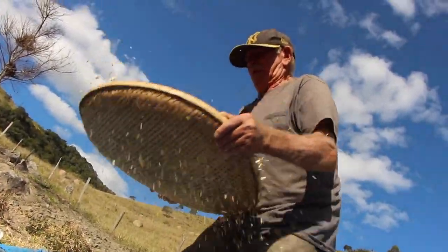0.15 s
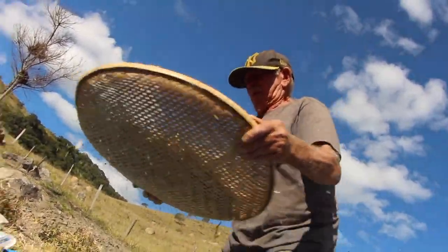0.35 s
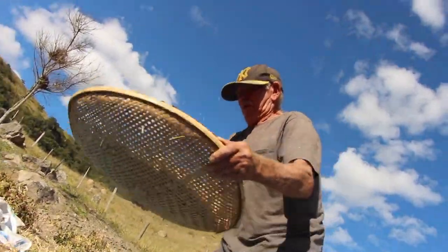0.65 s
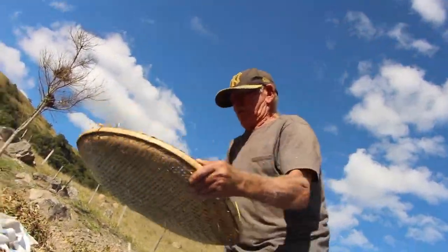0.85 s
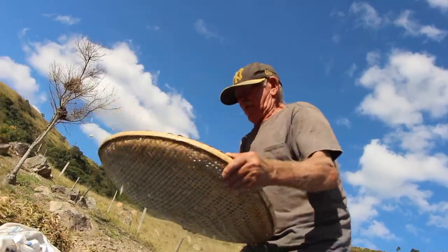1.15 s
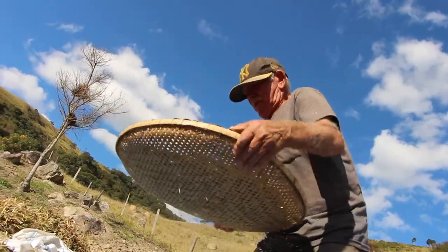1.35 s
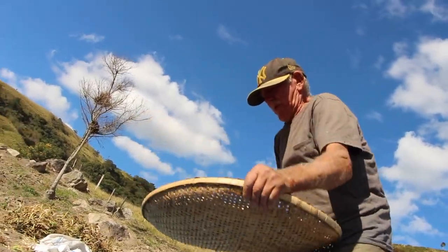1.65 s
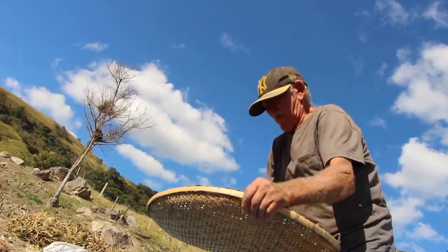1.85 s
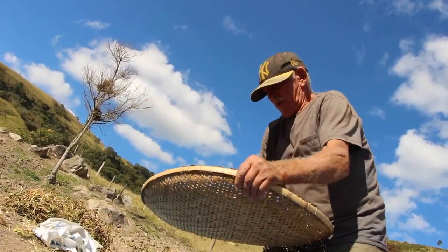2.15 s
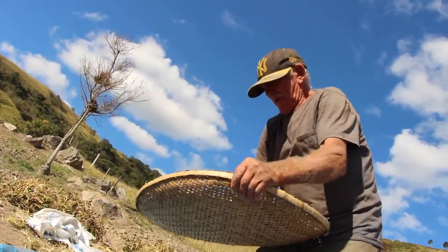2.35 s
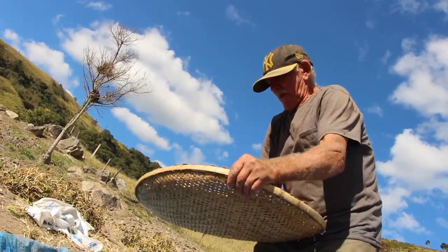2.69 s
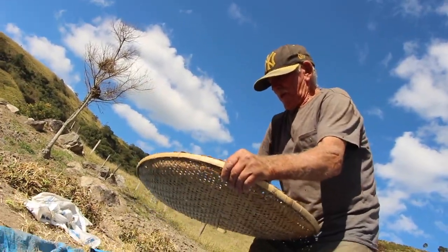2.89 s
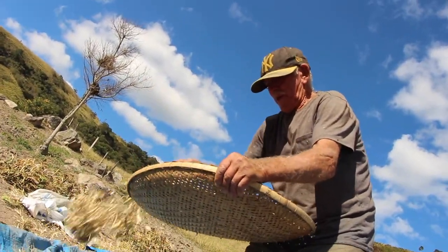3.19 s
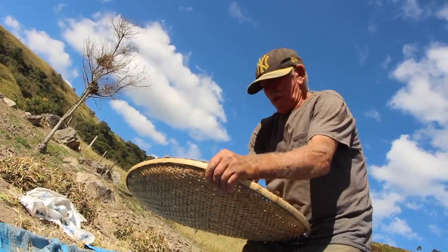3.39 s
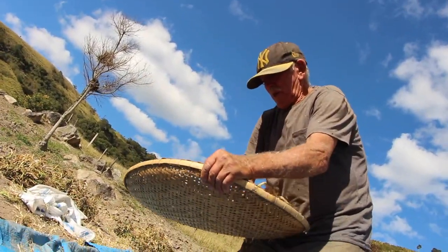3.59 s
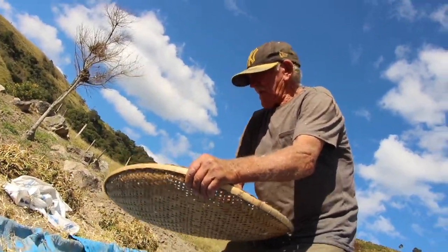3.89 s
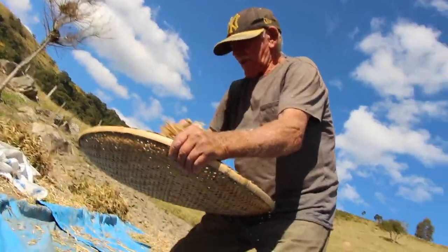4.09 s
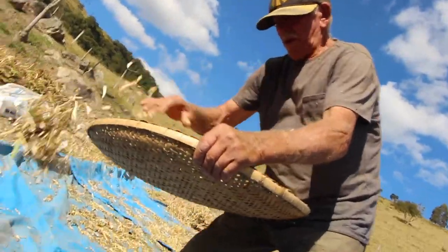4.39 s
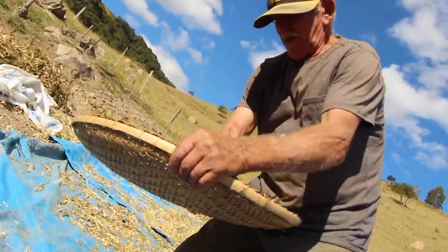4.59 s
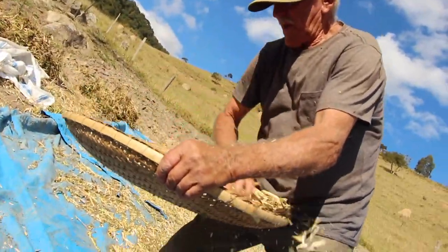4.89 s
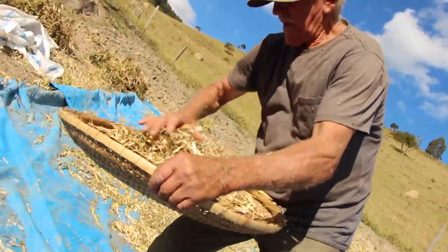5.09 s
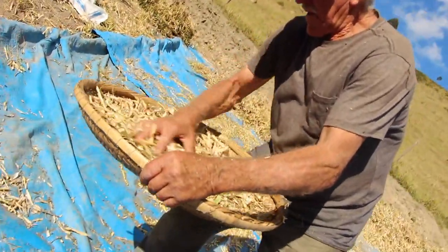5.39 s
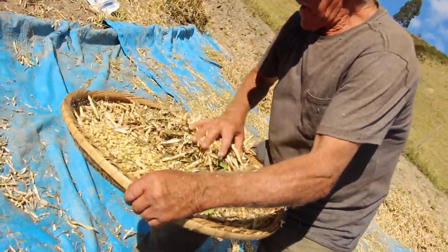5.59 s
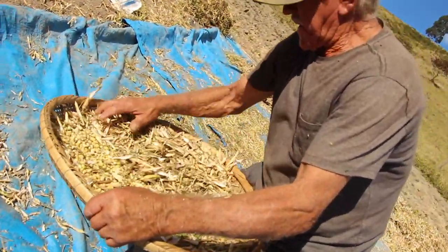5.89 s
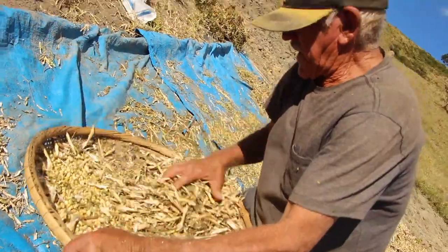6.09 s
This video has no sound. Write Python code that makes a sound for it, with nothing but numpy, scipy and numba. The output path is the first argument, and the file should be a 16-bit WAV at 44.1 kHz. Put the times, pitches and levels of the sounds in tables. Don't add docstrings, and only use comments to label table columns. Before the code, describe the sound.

Close up on an open hillside, dry pods, beans and chaff are tossed in a woven sieve in quick, regular, bright swishes. The shaking stops and a hand rakes the heap in softer uneven strokes, with brittle snaps, ticks and scrapes on the weave. Two handfuls fall back with short crunchy bursts, then broader raking follows. Low wind buffets the stereo microphone over faint air and hiss.

```python
import sys
import numpy as np
from scipy import signal
from scipy.fft import rfft, irfft
from scipy.io import wavfile
from scipy.ndimage import uniform_filter1d
from numba import njit

SR = 44100
rng = np.random.default_rng(int(sys.argv[2]) if len(sys.argv) > 2 else 0)


def inscribe(sig):
    pcm = np.round(np.clip(np.atleast_2d(sig).T, -1, 1) * 32767)
    wavfile.write(sys.argv[1], SR, pcm.astype(np.int16))


def field_ratio(decibels):
    return 10 ** (np.asarray(decibels, dtype=float) / 20)


N = 275625
T = np.arange(N) / SR
SLOW = T[::32]


def unit(x):
    return x / np.sqrt(np.mean(x ** 2))


def band(x, lo_hz, hi_hz):
    edges_hz = [lo_hz, min(hi_hz, .45 * SR)]
    return signal.sosfilt(signal.butter(4, edges_hz, "band", fs=SR, output="sos"), x)


def colour(x, points):
    hz, db = np.transpose(points)
    f = np.maximum(np.arange(N // 2 + 1) * SR / N, 1)
    gain_db = np.interp(np.log(f), np.log(hz), db)
    return unit(irfft(rfft(x) * field_ratio(gain_db), N))


def walk(rate_hz):
    hold = max(int(SR / rate_hz), 1)
    steps = np.repeat(rng.standard_normal(N // 20), hold)[:N]
    return unit(uniform_filter1d(steps, hold))


def swells(s, db, rise_s, fall_s, steep):
    late_s = SLOW[:, None] - s
    side_s = np.where(late_s < 0, rise_s, fall_s)
    return np.sum(field_ratio(2 * db - 20 * steep * (late_s / side_s) ** 2), axis=1)


def as_db(power):
    return np.interp(T, SLOW, 10 * np.log10(power))


@njit
def rings(start, hz, t60, size, length):
    out = np.zeros(length)
    for k in range(len(start)):
        pole = (2j * np.pi * hz[k] - np.log(1000) / t60[k]) / SR
        first = int(np.ceil(start[k]))
        z = size[k] * np.exp(pole * (first - start[k]))
        p = np.exp(pole)
        for i in range(max(first, 0), min(first + int(t60[k] * SR) + 2, length)):
            out[i] += z.imag
            z *= p
    return out


def both_ports(s, hz, t60, size, place, pan_db):
    port_lag, lag_scatter = 1.88, .38
    shift_lag, shift_s, shift_lasts_s = .2, 3.9, .6
    shifted = np.clip((s - shift_s) / shift_lasts_s, 0, 1)
    lag = (port_lag + shift_lag * shifted) * (1 + .2 * (hz / 13000) ** 2) + lag_scatter * place
    left = rings(s * SR, hz, t60, size * field_ratio(pan_db / 2), N)
    right = rings(s * SR + lag, hz, t60, size * field_ratio(-pan_db / 2), N)
    return np.array([left, right])


def rustle():
    # [lowest f/Hz, highest f/Hz, cycles rung, collisions/s, size scatter/dB,
    # left minus right/dB, trim/dB]
    pieces = [
        (1057, 3770, 3.33, 4000., 0, 0.3, 0.5),
        (410, 1030, 4.1, 2200., 5, 1.5, -9.5),
        (3920, 10770, 2.36, 10000., 0.5, 1.3, -0.14),
        (9740, 14100, 0.56, 7600, -0.5, 0, 3),
    ]
    # [f/Hz, width/Hz, level/dB]
    dish = [
        (584, 26, -26),
        (1470, 56, -26),
        (2000, 700., -16.5),
        (5740, 670, -25),
    ]
    levels_db = stirring()
    crowd = np.clip(field_ratio(.6 * (levels_db[2] + 29.0)), .35, 1)
    lumpy = np.clip(.75 - 0.39 * crowd, 0, 1)
    bursts = (avalanches(110.0, 0.0068) + avalanches(29.0, 0.039)) / 2
    slips = np.sqrt(1 - lumpy + lumpy * bursts)
    dry_heap = 0
    for (*piece, trim_db), db in zip(pieces, levels_db):
        level = field_ratio(db + trim_db + 0.61 * walk(24))
        dry_heap = dry_heap + level * slips * heap(*piece, crowd)
    out = dry_heap
    for hz, width_hz, db in dish:
        out = out + field_ratio(db) * signal.lfilter(*signal.iirpeak(hz, hz / width_hz, SR), dry_heap)
    return out


def stirring():
    # [peak t/s, level/dB]
    shakes = [(-.06, -20), (0.056, -21), (0.222, -19.5), (0.418, -18.5), (.575, -20.5), (.67, -30),
              (.754, -22), (0.916, -19.5), (1.07, -20.5), (1.233, -20), (1.36, -26)]
    # [peak t/s, level/dB, rise/s, fall/s, chaff above pods/dB]
    strokes = [(1.45, -36.5, 0.044, 0.079, -11), (1.591, -30, 0.12, .1, -9),
               (1.751, -32, 0.045, 0.065, -11), (2.19, -30, 0.045, 0.071, -11),
               (2.38, -30, 0.3, 0.063, -10.5), (2.534, -35, 0.077, 0.041, -17),
               (2.68, -31.5, 0.13, 0.091, -18), (2.849, -32.5, .13, 0.048, -19),
               (3.08, -37.5, 0.25, 0.14, -16), (3.178, -35, 0.052, 0.064, -7.5),
               (3.27, -44, 0.056, 0.099, -6), (3.82, -30, 0.25, 0.25, -11), (4.26, -40.5, .16, 0.14, -5),
               (4.377, -39, 0.065, 0.11, -1.5), (4.481, -39, 0.027, 0.026, -1),
               (4.536, -41, .03, 0.026, -9), (4.91, -24.5, 0.23, 0.24, -8.5), (5.306, -37, 0.041, .09, -5),
               (5.51, -26, 0.089, .21, -5), (5.841, -32, 0.1, 0.059, -2), (5.938, -34.5, .045, 0.033, -4),
               (6.1, -24, 0.077, .33, -4.5)]
    # [peak t/s, mesh level/dB, half width/s, beans above mesh/dB]
    scrapes = [(.5, -32, 0.091, -22), (1.491, -23.5, 0.072, -10), (1.62, -39, .12, 4.5),
               (1.756, -35.5, 0.06, 1.9), (1.889, -37, 0.057, -6), (2.359, -47.5, 0.06, 13),
               (2.86, -41, 0.11, -2.5), (3.27, -41.5, 0.097, -4.5), (3.8, -37, 0.23, -3.5),
               (4.3, -43.5, 0.33, -6), (4.485, -44, 0.05, -7), (4.82, -29, 0.16, -9.5),
               (5.36, -34.5, 0.052, -12.5), (5.56, -36.5, .1, -11), (5.81, -32.5, 0.12, -24),
               (5.98, -36.5, 0.07, -13), (6.25, -37.5, 0.2, -8.5)]
    # [t/s, level/dB, pouring/s, 10 dB fade/s]
    drops = [
        (3.416, -36, 0.0027, .012),
        (3.429, -24, .02, .24),
        (4.607, -37.5, .02, 2.23),
        (4.626, -22.5, 0.062, .025),
    ]
    rest_db = (-58.5, -57, -50, -58)
    shake_mix_db = (-4, -12.5, -0.9, -7)
    stroke_mix_db = (-10, -25, -1.2, -0.5)
    drop_mix_db = (-2, 8, -0.8, -4.5)
    steepness = (0.87, 1.43, 1.03, 1.06)
    drop_fade = (1.32, 2.9, 0.95, 1.33)
    shake_rise_s, shake_fall_s, drop_attack_s = .11, 0.096, 0.0021
    toss_s, toss_db = np.transpose(shakes)
    rake_s, rake_db, rise_s, fall_s, chaff_db = np.transpose(strokes)
    drag_s, drag_db, half_s, beans_db = np.transpose(scrapes)
    drop_s, drop_db, pour_s, fade_s = np.transpose(drops)
    late_s = SLOW[:, None] - drop_s
    power = field_ratio(2 * np.array(rest_db))[:, None] + 0 * SLOW
    for k, steep in enumerate(steepness):
        power[k] += swells(toss_s, toss_db + shake_mix_db[k], shake_rise_s, shake_fall_s, steep)
        stroke_db = rake_db + stroke_mix_db[k] + chaff_db * (k == 3)
        power[k] += swells(rake_s, stroke_db, rise_s, fall_s, steep)
        before = np.maximum(-late_s, 0) / drop_attack_s
        after = drop_fade[k] * np.maximum(late_s - pour_s, 0) / fade_s
        power[k] += np.sum(field_ratio(2 * (drop_db + drop_mix_db[k] - 10 * (before + after))), axis=1)
    power[0] += swells(drag_s, drag_db + beans_db, half_s, half_s, 0.99)
    power[1] += swells(drag_s, drag_db, half_s, half_s, 0.7)
    return [as_db(p) for p in power]


def avalanches(rate_hz, fade_s):
    kick = (rng.random(N) < rate_hz / SR) * rng.exponential(1, N)
    slips = signal.lfilter([1], [1, -np.exp(-1 / (fade_s * SR))], kick)
    return slips / slips.mean()


def heap(lo_hz, hi_hz, cycles, rate_hz, scatter_db, left_db, crowd):
    low_left_db = 1.5
    when, pitch, big, keep, place, sign, hard = rng.random((70000, 7)).T
    s = when * N / SR
    share = crowd[(when * N).astype(int)]
    on = keep < share * rate_hz * N / SR / len(keep)
    hz = lo_hz * (hi_hz / lo_hz) ** pitch
    t60 = 3 * cycles * 1.5 ** (hard - .5) / hz
    rare = -np.log(1 - .99 * big)
    size = field_ratio(scatter_db * rare) * np.sign(sign - .5) / np.sqrt(t60 * share)
    place = np.sqrt(12) * (place - .5)
    pan_db = left_db + low_left_db * (hz < 1000) - 3.6 * place
    x = both_ports(s[on], hz[on], t60[on], size[on], place[on], pan_db[on])
    return unit(band(x, 0.62 * lo_hz, 1.03 * hi_hz))


def snaps():
    s, knock_db, body_db, tick_db, hz, length_ms = np.transpose(snap_rows())

    def ring(at, db, ring_hz, cycles, part, pan_db):
        size = part * field_ratio(db - 1) * np.sqrt(.006 * 4 * np.log(1000) * ring_hz / cycles)
        return both_ports(at, ring_hz, cycles / ring_hz, size, 0, pan_db)

    body_hz = np.where(hz < 4000, hz, 2600.)
    tick_hz = np.where(hz < 4000, 7000., hz)
    late, pitch, sign = rng.random((len(s), 3, 14)).transpose(1, 2, 0)
    late = late * np.linspace(0, 3, len(late))[:, None]
    pitch[0] = .5
    share = np.exp(-.6 * late) * np.sign(sign - .5)
    share[0] = 3 / length_ms
    share /= np.sqrt(np.sum(share ** 2, axis=0))
    at = (s + late * length_ms / 1000).ravel()
    out = band(ring(s, knock_db, 700. + 0 * s, 2.6, .8, 4.0), 260., 6000.)
    body = (body_hz, body_db, 6.0, (900., 6000.))
    shell = (tick_hz, tick_db, 10.0, (2800., 15000.))
    for ring_hz, db, cycles, edges_hz in (body, shell):
        bit_hz = np.minimum(ring_hz * 1.3 ** (2 * pitch - 1), .36 * SR).ravel()
        bits = ring(at, np.tile(db, len(late)), bit_hz, cycles, share.ravel(), 1.0)
        out = out + band(bits, *edges_hz)
    return out


def snap_rows():
    # [t/s, knock/dB, pod body/dB]
    knocks = [(0.1216, -31, -41), (.561, -19.5, -21), (1.4156, -38, -42), (1.4613, -34, -33),
              (1.5084, -32, -34), (1.574, -16, -21), (1.9744, -34, -33), (2.6008, -43, -34),
              (3.4147, -30, -30), (3.4411, -26, -19), (3.5478, -29, -25), (3.589, -28, -46),
              (4.6061, -23, -28), (4.6933, -23, -42), (4.941, -31, -48), (5.205, -43, -36),
              (5.29, -45, -32.5), (5.3063, -25.5, -24.5), (5.55, -25, -19.5), (5.581, -29, -45),
              (5.7066, -34.5, -29.5), (5.8354, -47, -29), (6.2172, -30.5, -50)]
    # [t/s, body/dB, f/Hz, shell tick/dB]
    cracks = [(0.4683, -18, 2890, -19), (1.833, -35, 1800, -53), (1.845, -35, 2670, -45),
              (1.881, -33, 2480, -37), (1.908, -31.5, 3080, -46), (1.9145, -41, 1210, -60.5),
              (2.017, -42, 3400, -51), (2.1104, -37, 3080, -53), (2.388, -28, 1620, -42),
              (3.0146, -38, 1890, -51), (3.0905, -38, 3300, -37), (4.052, -47, 2150, -50),
              (4.4305, -36, 2410, -31.5), (4.5362, -40, 3600, -41), (4.636, -16, 1470, -25),
              (4.7497, -36, 1920, -21.5), (5.3146, -45, 3800, -46), (5.355, -34, 2520, -37),
              (5.3703, -30.5, 1660, -36), (5.4648, -24, 1790, -28.5), (5.475, -30, 2600, -47),
              (5.56, -21.5, 3070, -42), (5.776, -42, 3500, -52), (5.9133, -46, 3700, -30),
              (5.9258, -30, 3880, -43), (5.9613, -30, 3700, -51)]
    # [t/s, tick/dB, f/Hz, length/ms]
    ticks = [(1.9607, -39, 5200, 2.4), (2.046, -25.5, 7800, 1.7), (2.0638, -45, 10680, 3.6),
             (2.2061, -37, 4390, 2.4), (2.5729, -29, 10300, 5.3), (2.617, -27, 8570, 1.6),
             (2.672, -26, 8140, 4.5), (2.725, -31, 10100, 1.2), (2.9917, -32.5, 4640, 2.7),
             (3.124, -31, 8440, 1.2), (3.1512, -32, 9000, 2.6), (3.9624, -33, 8310, 3.7),
             (3.9719, -25.5, 8850, 4.7), (3.9836, -30, 7150, 2.1), (4.0142, -30, 6200, 4.5),
             (4.3135, -21, 4900, 1.5), (4.3456, -30, 8010, .8), (4.3685, -28.5, 8450, 1.4),
             (4.3817, -30, 11760, 1.9), (4.4825, -35, 7150, 1.9), (4.524, -31, 12830, 2.2),
             (4.547, -29.5, 7320, 3.6), (4.9073, -21, 6250, 2.6), (5.2308, -29, 7040, 3.6),
             (5.341, -22, 10200, 0.35), (5.7379, -29.5, 10100, 1.3), (5.8164, -25, 7100, 2.2),
             (5.857, -30, 4730, 1.33), (5.919, -30, 4260, 5.9), (6.103, -30, 5470, 3.8)]
    knock_hz, knock_ms, knock_tick_db = 1480, 2.2, -9
    crack_ms, crack_knock_db = 2.4, -13
    tick_body_db, tick_body_db_per_oct, tick_knock_db = -11.5, -15, -27
    rows = []
    for s, knock, body in knocks:
        rows.append((s, knock, body, body + knock_tick_db, knock_hz, knock_ms))
    for s, body, hz, tick in cracks:
        rows.append((s, body + crack_knock_db, body, tick, hz, crack_ms))
    for s, tick, hz, ms in ticks:
        body = tick + tick_body_db + tick_body_db_per_oct * np.log2(hz / 5000)
        rows.append((s, tick + tick_knock_db, body, tick, hz, ms))
    return rows


def rim():
    # [t/s, peak level/dB, f/Hz, t60/s]
    thuds = [
        (.507, -18.5, 126, 0.014),
        (.557, -21.5, 380, 0.011),
        (.561, -28, 430, 0.014),
        (.572, -20.5, 614, 0.022),
        (1.47, -32.5, 130, 0.092),
        (2.214, -34.5, 680, 0.075),
        (2.274, -42, 680, .03),
        (3.92, -39, 133, 0.072),
        (4.12, -33, 124, 0.042),
        (5.783, -30, 305, 0.085),
    ]
    s, db, hz, t60 = np.transpose(thuds)
    return uniform_filter1d(both_ports(s, hz, t60, field_ratio(db), 0, 3.0), size=12)


def wind():
    # [f/Hz, density/dB]
    spectrum = [(8.8, -27), (15, 5), (27, 3.5), (47, 1), (67, -7), (156, -25), (242, -37), (260, -45),
                (340, -63), (570, -120)]
    # [peak t/s, level/dB, half width/s]
    puffs = [(.19, -44, 0.077), (.36, -44, 0.11), (.62, -46.5, 0.55), (1.3, -43, 0.13), (1.531, -37, .11),
             (1.68, -37.5, 0.13), (1.87, -36, 0.085), (1.99, -31, 0.11), (2.21, -38.5, 0.058),
             (2.37, -39.5, 0.18), (2.66, -38.5, .11), (2.89, -43, 0.069), (3.05, -43.5, 0.18),
             (3.43, -52, 0.094), (3.98, -42, 0.073), (4.25, -44.5, 0.94), (4.595, -38, 0.055),
             (4.77, -30.5, 0.041), (4.94, -34.5, 0.1), (5.12, -34.5, 0.065), (5.43, -35, 0.2),
             (5.73, -32, .16), (5.969, -30, 0.06), (6.15, -31.5, 0.093)]
    breeze_db = -59.5
    eddies = [colour(rng.standard_normal(N), spectrum) * field_ratio(2 * walk(4.9)) for _ in range(2)]
    s, db, half_s = np.transpose(puffs)
    gust_db = as_db(swells(s, db, half_s, half_s, 0.89) + field_ratio(2 * breeze_db))
    port_db = np.array([[-1.3], [1.3]])
    return np.array(eddies) * field_ratio(port_db + gust_db + 2.5)


def field():
    # [f/Hz, density/dB]
    spectrum = [(120, -25), (200, -3.5), (268, -7.5), (345, -9), (437, -7), (596, -5.5), (15500, -28)]
    air_db, hiss_db = -53, -54.5
    air = np.array([colour(rng.standard_normal(N), spectrum) for _ in range(2)])
    return field_ratio(air_db) * air + field_ratio(hiss_db) * rng.standard_normal((2, N))


def scene():
    return rustle() + snaps() + rim() + wind() + field()


def top_cut(x):
    return signal.sosfilt(signal.butter(12, 16510, fs=SR, output="sos"), x)


def record(dry):
    top_hz = 15800
    low_pass = signal.ellip(10, .2, 80, top_hz, fs=SR, output="sos")
    mix = signal.sosfilt(low_pass, np.tanh(dry))
    return top_cut(mix)


dry = scene()
out = record(dry)
inscribe(out)
```